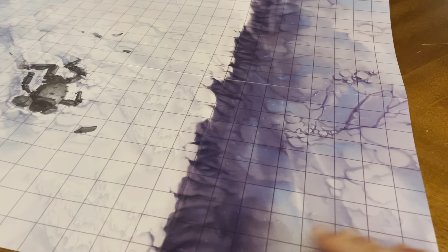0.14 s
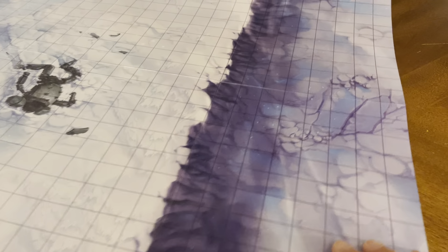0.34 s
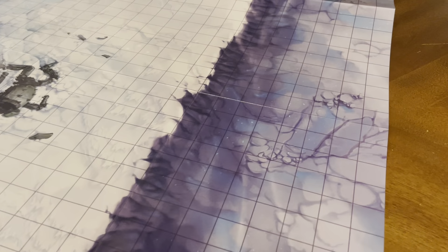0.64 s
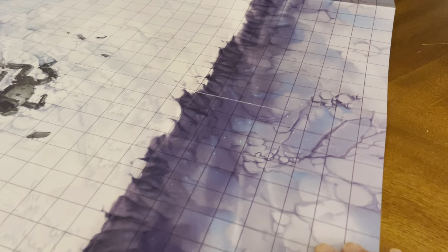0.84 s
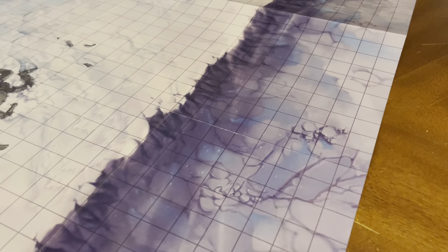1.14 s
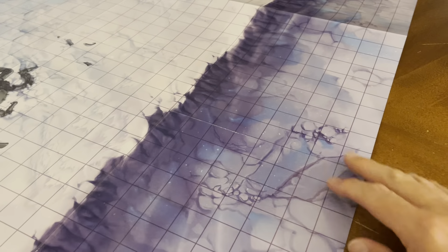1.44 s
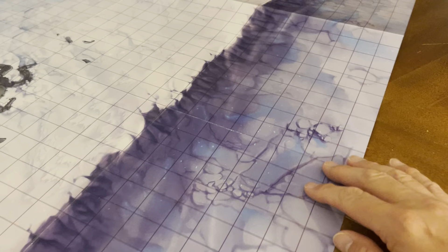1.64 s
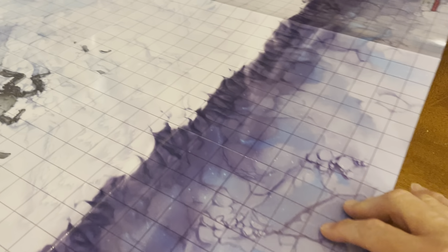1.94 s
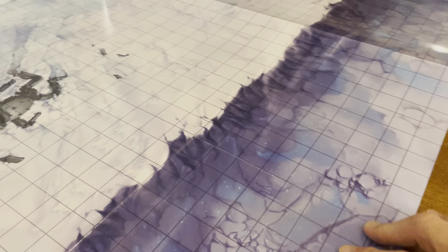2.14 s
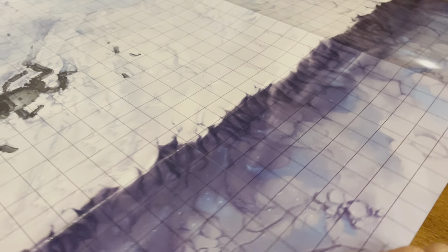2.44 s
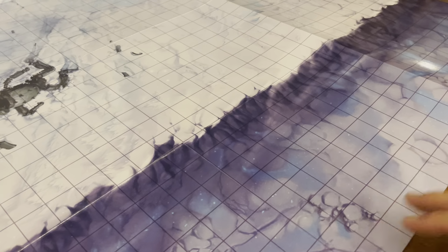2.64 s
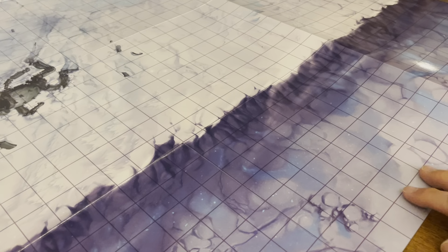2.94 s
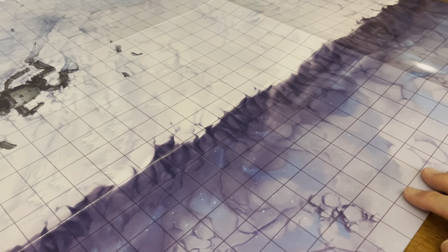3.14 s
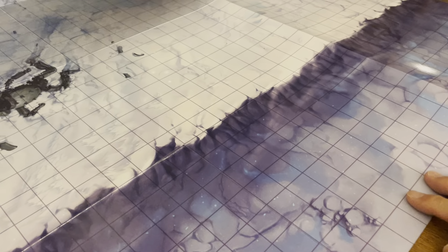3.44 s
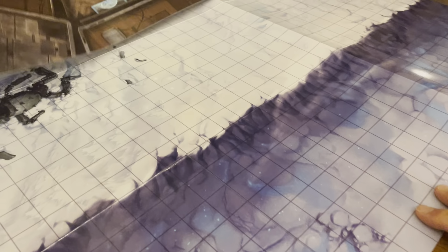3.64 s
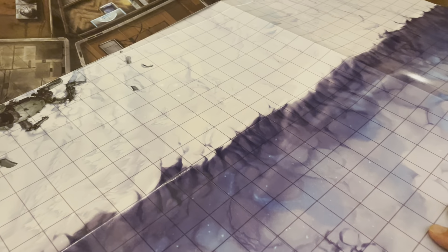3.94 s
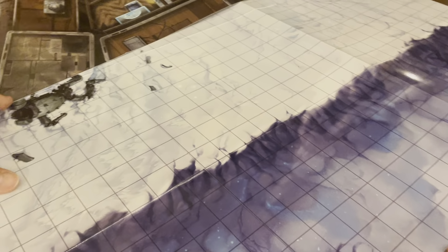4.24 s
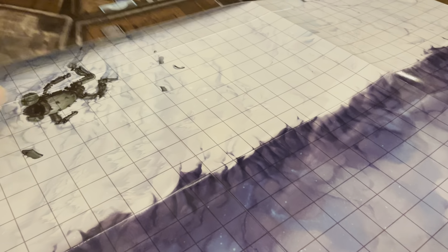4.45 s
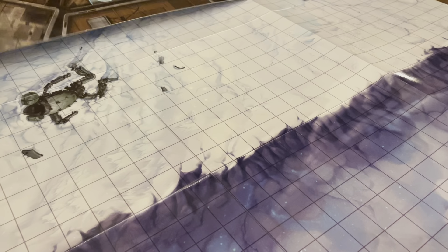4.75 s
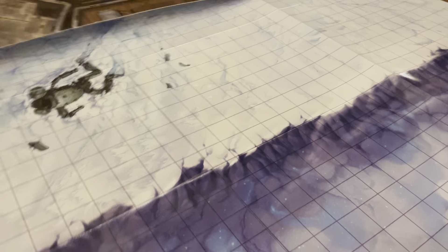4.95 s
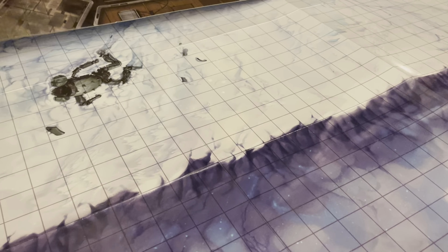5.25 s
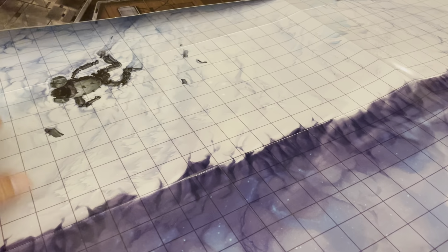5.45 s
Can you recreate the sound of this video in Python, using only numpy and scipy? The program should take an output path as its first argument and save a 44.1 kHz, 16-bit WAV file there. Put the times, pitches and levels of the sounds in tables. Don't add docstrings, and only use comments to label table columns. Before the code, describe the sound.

A quiet small room, phone held close above a large stiff glossy paper sheet on a wooden table. A brief bright swish at 0 s stops abruptly; tiny grit ticks follow near 0.25 s. Dry hissing drags swell at 0.3-0.6 and 0.9-1.13 s, with faint ticks and a short swipe near 1.6 s. From 1.7 to 2.5 s a longer, fuller slide rustles, ending in a low flutter and a pop with a soft table thump at 2.56 s. It calms, with a small snap at 2.9 s. From 3.4 s rustling thickens; a sharp crack at 3.55 s, then the loudest, crisp snap at 3.84 s with fraying crackle. Faint fingertip squeaks rise around 4.0 s and chirp at 4.4 s over another swish. Crackles scatter at 4.3-4.8 s, strongest at 4.66. A sudden bright scrape at 4.94 s fades through a pop at 5.08 s into light ticks and near stillness.

```python
import sys
import numpy as np
from scipy import signal
from scipy.fft import rfft, irfft, next_fast_len
from scipy.io import wavfile
from scipy.ndimage import uniform_filter1d

SR = 44100
rng = np.random.default_rng(int(sys.argv[2]) if len(sys.argv) > 2 else 0)


def rack_gain(trim_db):
    fader = np.asarray(trim_db, float)
    return 10 ** (fader / 20)


def materialize(psi):
    bounded = np.clip(np.atleast_2d(psi).T, -1, 1)
    quanta = np.round(bounded * 32767).astype(np.int16)
    wavfile.write(sys.argv[1], SR, quanta)


N = 246959

# f/Hz, density/dB per Hz
HISS_COLOUR = [(900, -7.5), (1400, -3.5), (2000, -6.5), (2600, -4), (3400, -3.5), (4300, -2.5),
               (5900, -3.5), (7000, -4.5), (8500, -8.5), (11000, -11.5), (13000, -12.5), (15900, -12.5)]
# f/Hz, density/dB per Hz
RUSTLE_COLOUR = [(150, -1), (260, 1), (350, 1.5), (500, -0.5), (780, 3), (1050, -2), (1350, -9),
                 (2000, -13.5)]
# f/Hz, density/dB per Hz
FLUTTER_COLOUR = [(25, -19), (41, -6), (60, 3.5), (110, -1.5), (190, -3), (280, -11.5), (420, -20.5)]
# f/Hz, density/dB per Hz
AIR_COLOUR = [(30, 0.5), (60, 13), (140, 3.5), (300, -16), (700, -24), (2000, -37), (6000, -55),
              (9000, -47), (15500, -52.5)]
# f/Hz, level/dB
CRACK_COLOUR = [(900, 7.5), (1800, 3), (3000, 7), (6000, 4.5), (9000, -1), (13000, -5.5), (16500, -16)]
# f/Hz, level/dB
KNOCK_COLOUR = [(160, -6.5), (300, 3.5), (450, -0.5), (700, -1), (1100, -7.5), (1900, -27.5)]
# f/Hz, level/dB
BOOM_COLOUR = [(30, -42.5), (60, -3.5), (90, -0.5), (160, -5), (250, -12.5), (420, -41.5)]
# start/s, fastest/s, stop/s, full-speed hiss/dB, rustle over hiss/dB
STROKES = [(0, 0.008, 0.056, -53, -4), (0.104, 0.16, 0.24, -76, -24), (0.317, 0.42, 0.61, -55.5, -1.5),
           (0.708, 0.71, 0.8, -75.5, -17), (0.889, 1.077, 1.129, -52, -4), (1.17, 1.175, 1.3, -71.5, -16),
           (1.336, 1.353, 1.49, -75, -6), (1.527, 1.588, 1.593, -56, -3), (1.676, 1.92, 2.43, -54, -1.5),
           (2.04, 2.3, 2.542, -53.5, 0), (2.917, 2.95, 3.22, -74.5, 0.5), (3.055, 3.07, 3.105, -64, 4.5),
           (3.226, 3.274, 3.6, -77.5, 2.5), (3.376, 3.4, 3.45, -68, 12.5), (3.447, 3.49, 4.2, -64.5, 0.5),
           (3.55, 3.587, 3.75, -59, 4.5), (3.693, 3.723, 3.81, -56.5, 5.5), (3.8, 3.9, 4.13, -59.5, 4.5),
           (4.07, 4.376, 4.473, -55.5, 1.5), (4.58, 4.6, 4.76, -65, 9.5), (4.83, 4.84, 4.83, -63, 2),
           (4.935, 4.935, 5.12, -45.5, -10.5), (5.181, 5.3, 5.32, -62.5, -10),
           (5.338, 5.444, 5.46, -68, -15.5)]
# start/s, fastest/s, stop/s, level/dB
BRUSHES = [(0, 0.01, 0.02, -56), (0.093, 0.134, 0.28, -83), (0.278, .3, .4, -73), (.705, 0.72, 0.81, -71.5),
           (0.863, .88, 0.93, -60), (1.09, 1.083, 1.17, -63), (1.184, 1.246, 1.3, -71.5),
           (2.8, 2.85, 2.8, -86), (3.204, 3.302, 3.5, -82), (5.04, 5.09, 5.01, -58),
           (5.18, 5.208, 5.27, -68.5), (5.555, 5.565, 6.2, -73)]
# t/s, hiss sharpness/dB, gloss whistle/dB
FACING = [(0, -0.5, -9), (.3, -6, -1), (.6, -12, -2), (.9, -10.5, 1), (1.15, -16.5, -2),
          (1.55, -19.5, -1.5), (1.85, -12, 0.5), (2.15, -11, 4.5), (2.5, -11, 5), (2.9, -14, -7),
          (3.07, -19, -7), (3.5, -17, 0.5), (3.8, -13, -0.5), (4.0, -17, -3.5), (4.3, -7.5, 8.5),
          (4.55, -27.5, -6.5), (5.0, -10.5, 2), (5.45, -20, -4)]
# t/s, flutter level/dB, length/s
PUFFS = [(0.045, -71, .1), (0.269, -49, 0.035), (0.64, -56.5, .1), (1.164, -59, 0.041), (1.4, -56.5, 0.093),
         (1.617, -47.5, 0.037), (2.518, -44, 0.096), (2.627, -49.5, 0.069), (2.965, -47, 0.1),
         (3.047, -47, 0.099), (3.32, -53.5, 0.23), (3.548, -43, 0.055), (3.654, -43, 0.13),
         (3.918, -41.5, 0.059), (4.424, -45, 0.072), (4.534, -46.5, 0.13), (4.77, -45, 0.026),
         (4.849, -47, 0.063), (4.922, -49, .05), (5.128, -46, 0.1), (5.297, -58.5, 0.038),
         (5.586, -60.5, 0.085)]
# t/s, crack peak/dB, crack ring f/Hz, knock peak/dB, boom peak/dB
POPS = [(.0834, -57, 1590, -49, -41.5), (1.2542, -70, 3070, -63, -57), (1.6202, -43.5, 4500, -52, -46),
        (2.5638, -40, 1400, -30, -24.5), (2.9118, -43.5, 4040, -66, -45), (3.2698, -60, 1580, -49, -52),
        (3.5518, -26, 2680, -26, -32.5), (3.8447, -16, 2990, -16, -27), (4.3121, -60, 5390, -39, -62),
        (4.345, -52, 1500, -43, -51), (4.385, -45, 1600, -44, -57), (4.432, -44.5, 2190, -45, -48),
        (4.56, -65, 2760, -55, -48), (4.5745, -39.5, 3060, -42, -49), (4.5939, -43.5, 2460, -39.5, -37.5),
        (4.6612, -27, 1650, -32, -28), (4.7371, -42.5, 2210, -49, -42.5), (4.812, -39.5, 1680, -46, -39),
        (5.0751, -33, 1550, -53, -38.5)]
# t/s, crack peak/dB, crack ring f/Hz, knock peak/dB, boom peak/dB
TEARS = [(1.3441, -46, 2400, -42.5, -64), (3.3428, -51.5, 3000, -41.5, -53),
         (3.5145, -35, 1780, -42, -38.5), (3.6942, -40.5, 2060, -43.5, -40),
         (3.7045, -39.5, 2980, -39, -40.5), (3.8163, -26.5, 2180, -39.5, -51.5),
         (3.8245, -33.5, 1500, -25, -49), (3.832, -37, 2590, -34.5, -55), (4.5181, -57.5, 1560, -48.5, -50),
         (4.6214, -50, 1770, -38.5, -36.5), (5.1222, -36, 2450, -47, -41.5)]
# t/s, crack peak/dB, crack ring f/Hz, knock peak/dB
TICKS = [(.802, -62, 9500, -75), (5.14, -50, 9500, -70), (.8161, -47.5, 5960, -54.5),
         (1.266, -58, 4410, -80), (1.301, -59, 4570, -77), (1.5564, -48, 2900, -61),
         (1.5683, -43, 5530, -61), (2.9418, -51.5, 3310, -76), (4.8808, -56, 3530, -72),
         (5.2054, -52, 2630, -69), (5.242, -60, 5390, -65), (5.3153, -54, 3810, -68),
         (5.5732, -66, 5710, -90), (.2379, -42, 7500, -49), (.2502, -45, 7500, -58), (.683, -59, 2100, -61),
         (1.1633, -54, 6250, -49), (.8614, -53, 10500, -75), (1.5259, -49, 4560, -62),
         (5.5388, -53, 9000, -80)]
# t/s, slip rate f/Hz, level/dB
SQUEAKS = [
    [(3.958, 385, -64), (3.985, 392, -51), (4.025, 450, -49), (4.05, 488, -55), (4.065, 497, -68)],
    [(4.355, 535, -66), (4.37, 548, -57), (4.385, 540, -62), (4.405, 575, -57), (4.42, 587, -66)],
    [(4.447, 560, -64), (4.46, 520, -55), (4.475, 450, -56), (4.495, 365, -66)],
]
SLIP_DB = [4.5, -5, -9, -13, -28]
# f/Hz, likeness/0-1, gain/dB
PORT = [(58.4, 0.99, -2), (293, 0.93, -3.5), (685, 0.5, -6.5), (1185, 0.2, -3), (2100, 0.3, -1.5),
        (3060, .65, -5), (4350, 0.6, -4.5), (5400, 0.67, -4), (7250, 1, -1.5), (8930, 0.92, 3),
        (11900, 0.75, -0.2), (15000, 0.96, -1)]
# f/Hz, lead/rad
PORT_LEAD = [(0, 0), (4300, 0), (5000, -1), (5800, .4), (8000, .88 * np.pi), (8650, 1.1 * np.pi),
             (10700, 1.9 * np.pi), (12300, 2.1 * np.pi), (14500, 2.96 * np.pi), (18000, 3.02 * np.pi)]

SLOW_ENDS_DB, START_DB_PER_S, STOP_DB_PER_S = -5, 376, 361
SETTLE_DB, SETTLE_DB_PER_S, REST_DB = -11, 105, -87
PUFF_FALL_DB, FLUTTER_OVER_RUSTLE_DB, FLUTTER_REST_DB = 6, -1.5, -69
GLOSS_HZ = 4330, 7100
BEND_DELAY_S, PATHS = .009, 14
TICK_BOOM_DB = -20
ROOM_T60_S, ROOM_DB, AIR_DB = 0.15, -9, -64.5


def on_log(table, hz, order=1):
    t = np.array(table, float)
    return np.interp(np.log(hz + 1), np.log(t[:, 0]), t[:, order])


def gain(table, count):
    hz = np.fft.rfftfreq(count, 1 / SR)
    below_oct = np.maximum(np.log2(table[0][0] / (hz + 1)), 0)
    above_oct = np.maximum(np.log2((hz + 1) / table[-1][0]), 0)
    return rack_gain(on_log(table, hz) - 9.3 * (below_oct + above_oct))


def colour(x, table):
    count = next_fast_len(N)
    return irfft(rfft(x, count) * gain(table, count), count)[..., :N]


def unit(x):
    return x / np.sqrt(np.mean(x ** 2))


def walk(rate_hz):
    k = int(SR / rate_hz)
    held = np.repeat(rng.standard_normal(N // k + 1), k)
    return 1.267 * uniform_filter1d(uniform_filter1d(held, k), k)[:N]


def band(x, lo_hz, hi_hz):
    return signal.sosfilt(signal.butter(2, [lo_hz, hi_hz], "bandpass", fs=SR, output="sos"), x)


def grains(table, rate_hz, scatter_db, flicker_db, lo_hz, hi_hz):
    size = (rng.random(N) < rate_hz / SR) * rack_gain(scatter_db * rng.exponential(size=N))
    x = colour(size * rng.standard_normal((2, N)), table)
    edges = table[0][0] * 2. ** np.arange(8)
    edges = edges[edges < table[-1][0]]
    lows = [signal.sosfilt(signal.butter(1, e, fs=SR, output="sos"), x) for e in edges]
    octaves = np.diff([0 * x, *lows, x], axis=0)
    x = sum(part * rack_gain(flicker_db * walk(16)) for part in octaves)
    return x / np.sqrt(np.mean(band(x, lo_hz, hi_hz) ** 2))


def drag(start, fast, stop):
    t = np.arange(N) / SR
    rising = (fast - t) / max(fast - start, .003)
    falling = (t - fast) / max(stop - fast, .003)
    slow = np.where(t < fast, rising, falling)
    after = np.maximum(t - stop, 0)
    fall = np.maximum(-STOP_DB_PER_S * after, SETTLE_DB - SETTLE_DB_PER_S * after)
    onset = START_DB_PER_S * np.maximum(start - t, 0)
    return SLOW_ENDS_DB * np.minimum(slow, 1) ** 2.07 - onset + fall


def stroke_levels():
    hiss_db, rustle_db = np.full(N, REST_DB + 0.), np.full(N, REST_DB - 2.5)
    for *times, db, weight_db in STROKES:
        level_db = db + drag(*times)
        hiss_db = np.maximum(hiss_db, level_db)
        rustle_db = np.maximum(rustle_db, level_db + weight_db)
    return hiss_db, rustle_db


def fibre_hiss(fibres, top, hiss_db):
    t = np.arange(N) / SR
    s, *columns = np.transpose(FACING)
    top_db, gloss_db = (np.interp(t, s, c) for c in columns)
    gloss = signal.sosfiltfilt(signal.butter(2, GLOSS_HZ, "bandpass", fs=SR, output="sos"), fibres)
    sharpness = top * (rack_gain(top_db + 10.5) - 1)
    whistle = gloss * (rack_gain(gloss_db + 2.4 * walk(25)) - 1)
    return rack_gain(hiss_db) * (fibres + sharpness + whistle)


def skin_brush(top):
    brush_db = np.full(N, -120.)
    for *times, db in BRUSHES:
        brush_db = np.maximum(brush_db, db + drag(*times))
    return rack_gain(brush_db) * unit(np.roll(top, N // 2, axis=1))


def sheet_rustle(rustle_db):
    rustle = grains(RUSTLE_COLOUR, rate_hz=4000, scatter_db=1.5, flicker_db=0.0, lo_hz=348, hi_hz=1234)
    return rack_gain(rustle_db + 0.5) * rustle


def air_flutter(rustle_db):
    t = np.arange(N) / SR
    flutter_db = np.maximum(rustle_db + FLUTTER_OVER_RUSTLE_DB, FLUTTER_REST_DB)
    for at, db, length in PUFFS:
        off_centre = np.abs(2 * (t - at) / max(length, .01))
        flutter_db = np.maximum(flutter_db, db - PUFF_FALL_DB * off_centre ** 1.02)
    flutter = grains(FLUTTER_COLOUR, rate_hz=1500, scatter_db=1.0, flicker_db=2.0, lo_hz=43.7, hi_hz=285)
    return rack_gain(flutter_db - 2.0) * flutter


def slide():
    hiss_db, rustle_db = stroke_levels()
    fibres = grains(HISS_COLOUR, rate_hz=14000, scatter_db=1.8, flicker_db=1.0, lo_hz=1500, hi_hz=7000)
    top = signal.sosfiltfilt(signal.butter(2, 7500, "high", fs=SR, output="sos"), fibres)
    rubbing = fibre_hiss(fibres, top, hiss_db) + skin_brush(top)
    return rubbing + sheet_rustle(rustle_db) + air_flutter(rustle_db)


def still_air():
    air = unit(colour(rng.standard_normal((2, N)), AIR_COLOUR))
    return air * rack_gain(AIR_DB + 2.0 * walk(8.9))


def crack_burst(ring_hz, fray, edge, rise_s, count):
    t, hz = np.arange(count) / SR, np.fft.rfftfreq(count, 1 / SR)
    noise = rng.standard_normal((2, count)) * (1 - np.exp(-t / rise_s))
    ring = 1 / (1 + ((hz - ring_hz) / (0.13 * ring_hz)) ** 2)
    tilt = (1 + hz / 3000) ** (edge + 0.58 * np.log2(ring_hz / 3500))
    tick = rfft(noise * np.exp(-t / 0.002)) * (0.46 + ring) * tilt
    torn_colour = 0.5 / (1 + (hz / ring_hz / 1.7) ** 3) + 1.8 * ring
    ragged = rfft(noise * np.exp(-t / 0.01)) * np.clip(fray, 0, 1) * torn_colour
    return irfft((tick + ragged) * gain(CRACK_COLOUR, count), count)


def bending_waves(count):
    hz = np.fft.rfftfreq(count, 1 / SR)
    path = rng.random((2, PATHS, 2))
    indirect = (np.arange(PATHS) > 0)[:, None]
    length = 1 + 6.5 * path[..., :1] * indirect
    sign = np.sign(path[..., 1:] - .5) * np.where(indirect, .6, 1)
    waves = sign * np.exp(-40j * np.pi * length * BEND_DELAY_S * np.sqrt(hz))
    knock = irfft(np.sum(waves * rack_gain(-2.2 * length), axis=1) * gain(KNOCK_COLOUR, count), count)
    boom = irfft(np.sum(waves * rack_gain(-3.5 * length), axis=1) * gain(BOOM_COLOUR, count), count)
    return knock, boom


def snaps(table, fray, edge=0, rise_s=.0002, count=8192):
    out, t = np.zeros((2, N + count)), np.arange(count) / SR
    fade = np.clip(t / .0003, 0, 1) * np.clip((.185 - t) / .04, 0, 1)
    for s, crack_db, ring_hz, knock_db, boom_db in table:
        crack = crack_burst(ring_hz, fray, edge, rise_s, count)
        knock, boom = bending_waves(count)
        parts = (crack_db, crack), (knock_db, knock), (boom_db, boom)
        i = int(s * SR)
        out[:, i:i + count] += fade * sum(rack_gain(db) * p / np.abs(p[0]).max() for db, p in parts)
    return out[:, :N]


def creases():
    return snaps(POPS, fray=.08, edge=0.018) + snaps(TEARS, fray=0.54, edge=-.8, rise_s=.0007)


def grit_ticks():
    return snaps([(*row, row[3] + TICK_BOOM_DB) for row in TICKS], fray=0.36, edge=0.98)


def room(x):
    t = np.arange(SR // 4) / SR
    tail = band(rng.standard_normal((2, len(t))), 129, 11000) * 1000 ** (-t / ROOM_T60_S) * (t > .004)
    return rack_gain(ROOM_DB) * signal.fftconvolve(x, tail / np.linalg.norm(tail[0]), axes=1)[:, :N]


def squeaks():
    out, t = np.zeros(N), np.arange(N) / SR
    for table in SQUEAKS:
        s, hz, db = np.transpose(table)
        slip_hz = np.interp(t, s, hz) * (1 + .018 * walk(120))
        phase = 2 * np.pi * np.cumsum(slip_hz) / SR
        fade = np.clip(np.minimum(t - s[0], s[-1] - t) / 0.0052, 0, 1)
        tone = np.zeros(N)
        for k, overtone_db in enumerate(SLIP_DB):
            level = rack_gain(overtone_db + (2.0 + k) * walk(70))
            tone += level * np.sin((k + 1) * phase + 0.8 * k)
        tone = signal.sosfilt(signal.butter(4, 1500, fs=SR, output="sos"), tone)
        out += np.sqrt(2) * rack_gain(np.interp(t, s, db)) * fade * tone
    return out


def scene():
    events = creases() + grit_ticks()
    return slide() + still_air() + events + room(events) + squeaks()


def low_pass(x):
    return signal.sosfilt(signal.butter(12, 15650, fs=SR, output="sos"), x)


def record(dry):
    count = next_fast_len(N)
    hz = np.fft.rfftfreq(count, 1 / SR)
    direct, second = rfft(dry, count)
    like = np.clip(on_log(PORT, hz), 0, 1)
    turn = np.exp(1j * np.interp(hz, *np.transpose(PORT_LEAD)))
    mixed = like * turn * direct + np.sqrt(1 - like ** 2) * second
    right = rack_gain(on_log(PORT, hz, order=2)) * mixed
    both = irfft(np.array([direct, right]), count)[:, :N] * rack_gain(1.0)
    return low_pass(both)


dry = scene()
out = record(dry)
materialize(out)
```